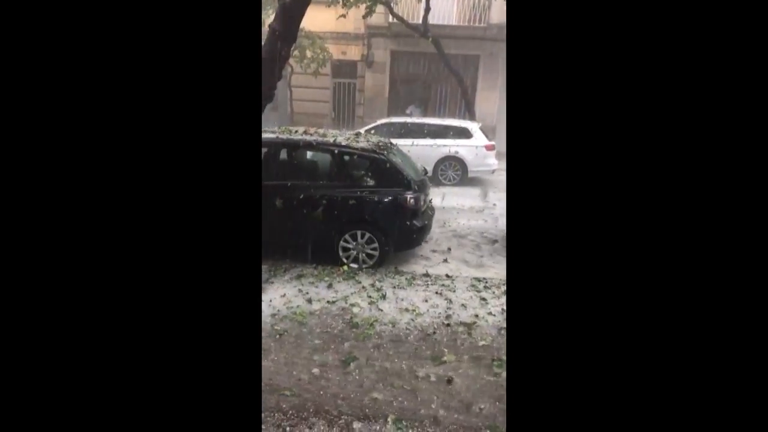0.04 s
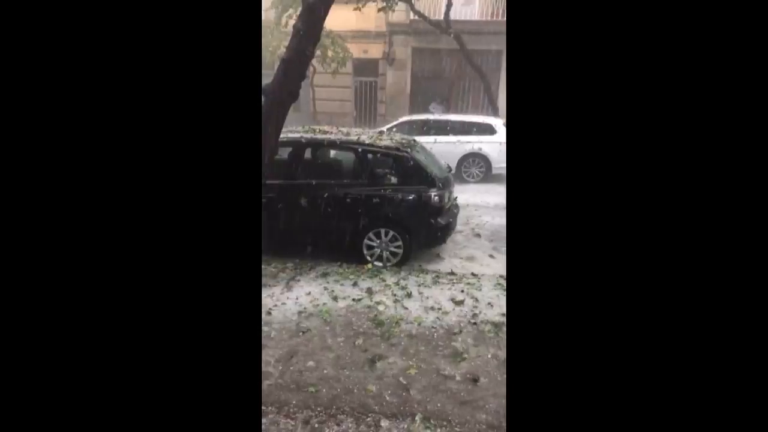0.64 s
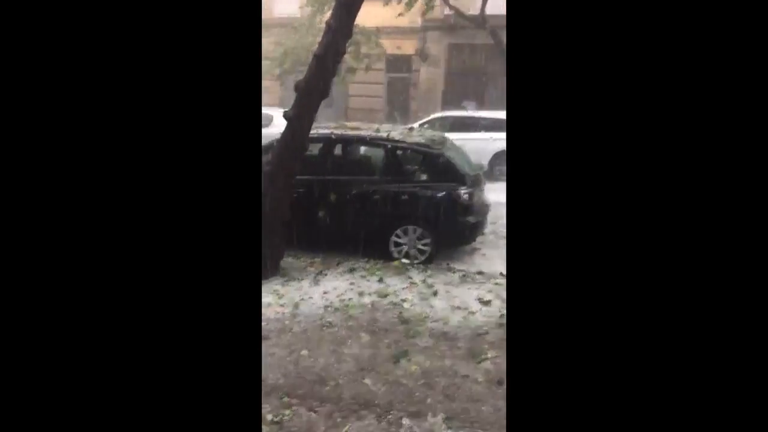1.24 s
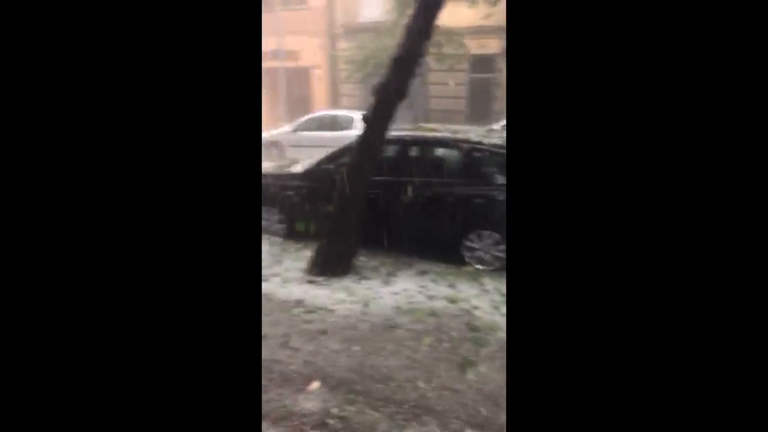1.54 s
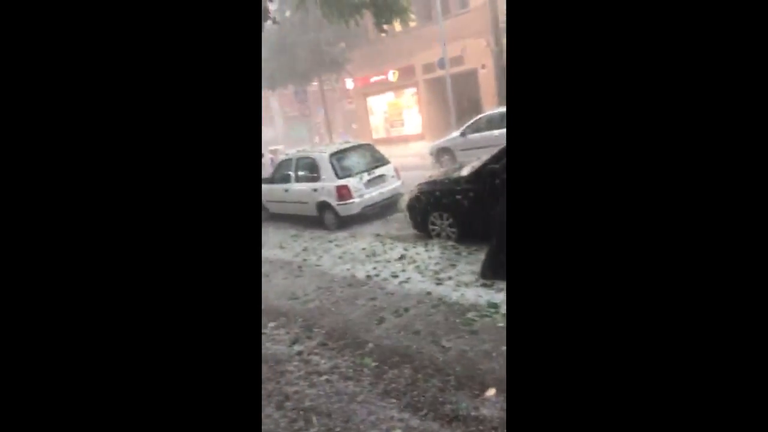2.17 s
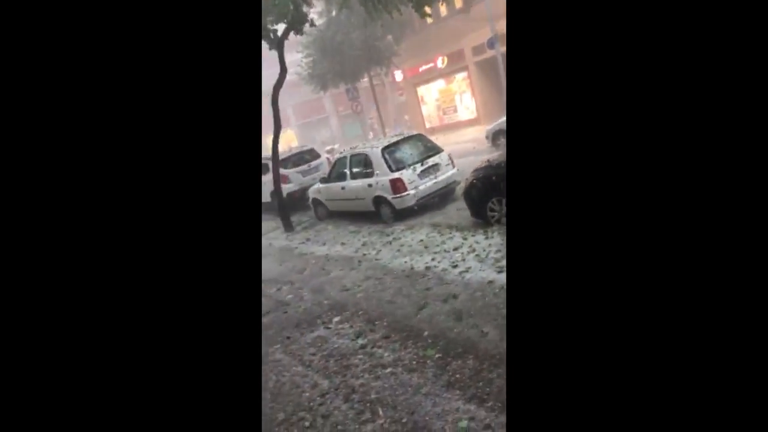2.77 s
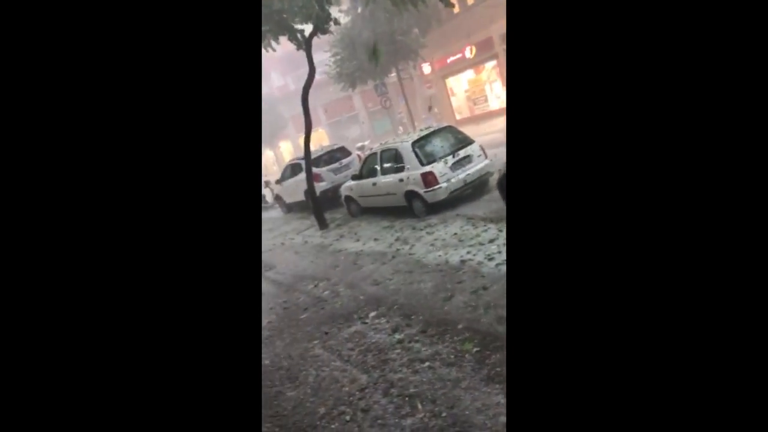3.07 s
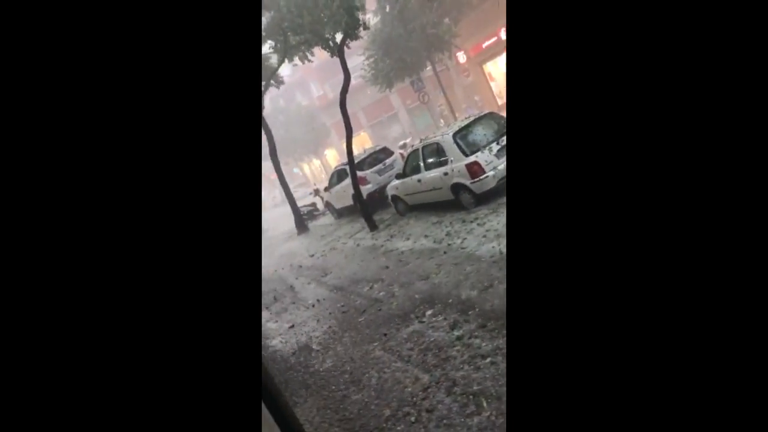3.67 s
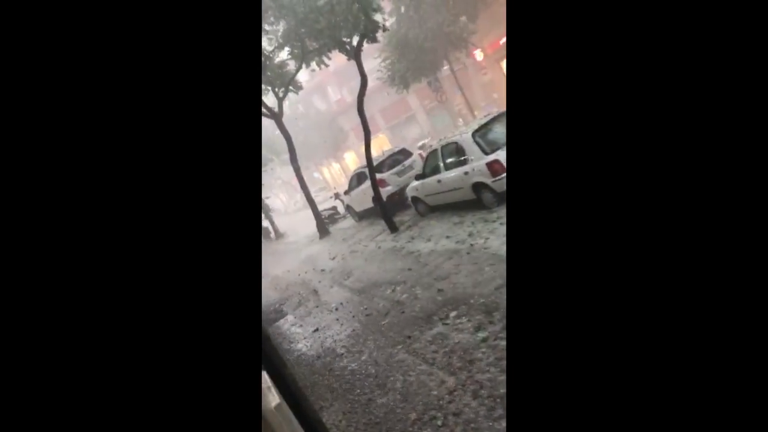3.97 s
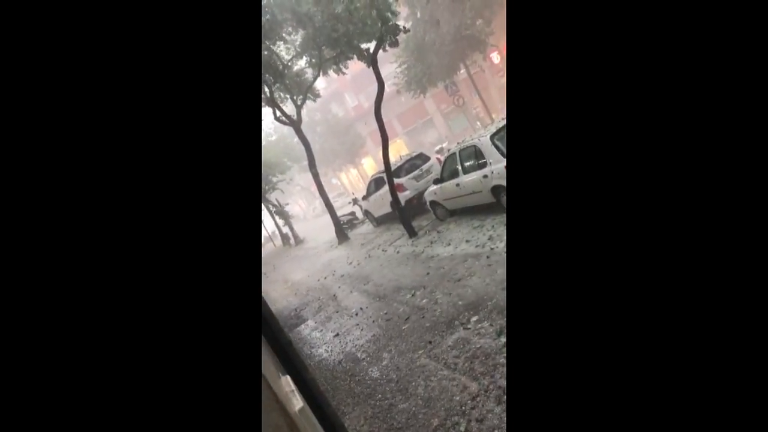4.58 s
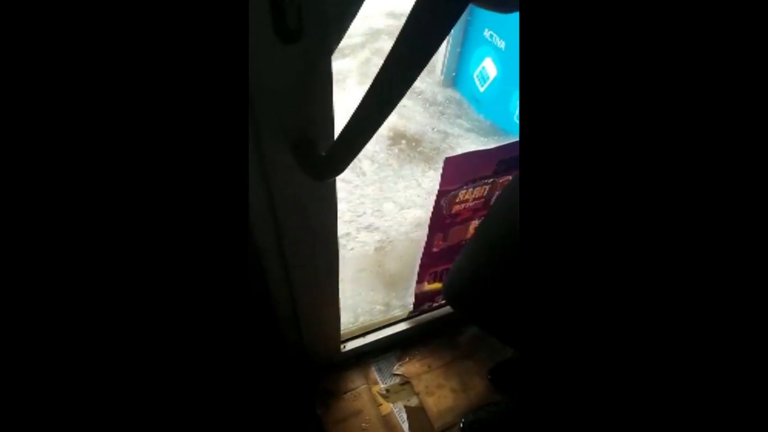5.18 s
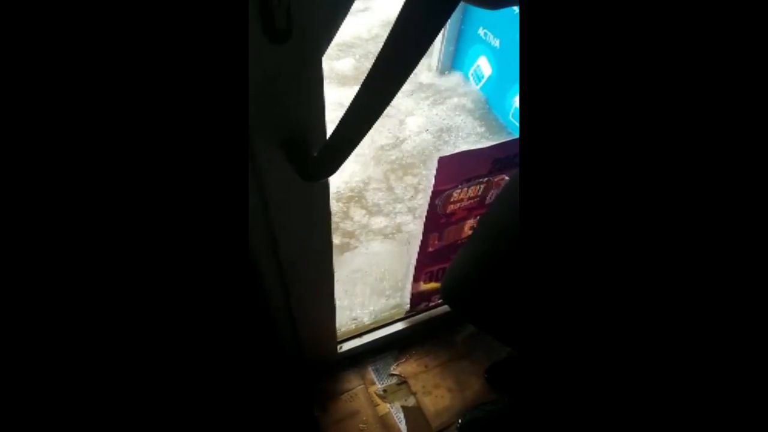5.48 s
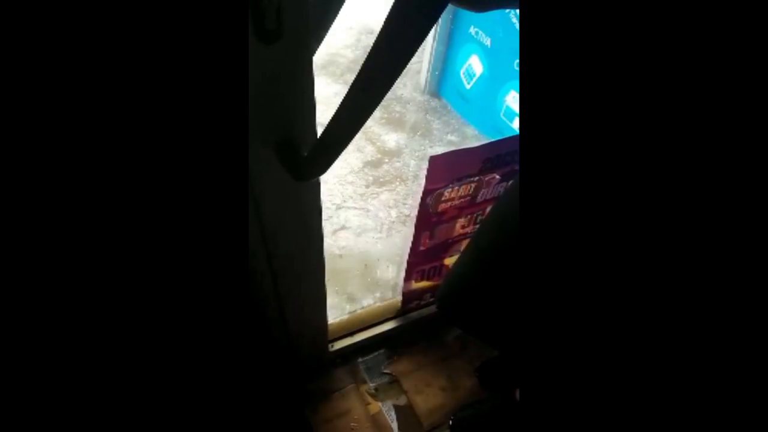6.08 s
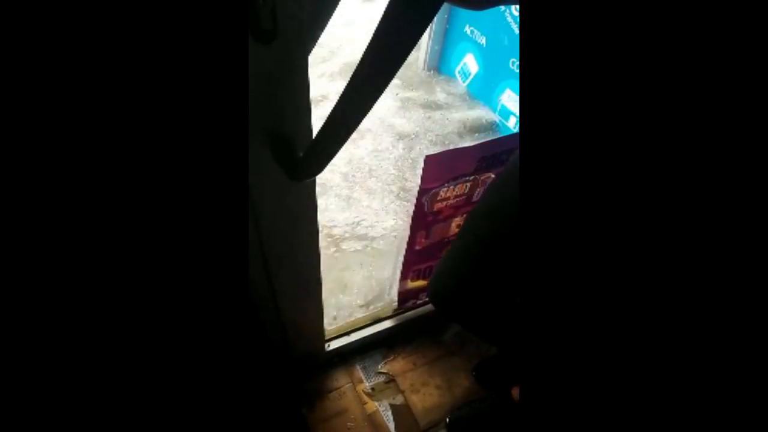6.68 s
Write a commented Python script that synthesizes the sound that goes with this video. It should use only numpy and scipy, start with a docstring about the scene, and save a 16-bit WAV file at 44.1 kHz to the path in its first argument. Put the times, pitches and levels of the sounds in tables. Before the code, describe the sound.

Heavy hail and rain fill a street with a loud, dense hiss, heard from a doorway. Nearer stones crack on the pavement, thud on parked car roofs and occasionally clink on metal, while gusts rumble underneath. After about five seconds the storm cuts off. A much fainter scene follows from inside a vehicle: floodwater rushes, bubbles and slaps at the door over a low engine drone and a few soft booms.

```python
"""A dense hiss of hail fills a street of parked cars, heard from a doorway. Countless random impacts
merge into noise; nearer stones tick and crack on the pavement and excite the modes of car roofs,
while gusts rumble underneath. Near 4.9 s the storm cuts off and a second, faint scene follows:
floodwater rushes, bubbles and slaps outside the door of a vehicle, whose engine drones at its
firing rate and whose body booms softly now and then."""
import sys
import numpy as np
from scipy import signal
from scipy.fft import rfft, irfft, next_fast_len
from scipy.io import wavfile
from scipy.ndimage import uniform_filter1d, map_coordinates

SR = 44100
rng = np.random.default_rng(int(sys.argv[2]) if len(sys.argv) > 2 else 0)


def dump_mix(stems):
    """Bounce the given channels to the path in sys.argv[1] as a 16-bit WAV at rate SR."""
    frames = np.atleast_2d(stems).T  # one column per channel
    limited = np.clip(frames, -1, 1)  # hard clip at full scale
    pcm = np.round(limited * 32767).astype(np.int16)
    wavfile.write(sys.argv[1], SR, pcm)


N = 300762

# bending modes of a car roof: f/Hz, relative level/dB, t60/s
ROOF_MODES = [(150.9, -5.5, 0.098), (184.5, -5, 0.12), (244.2, -1, 0.082), (267, -1.5, 0.07),
              (327.7, 1, 0.08), (380.8, 0, 0.058), (449, -3, 0.052)]
# spectrum of foam and droplets: f/Hz, relative level/dB
FOAM_SPECTRUM = [(2000, -7.5), (4500, 0), (6500, -3), (7800, -1.5), (10000, -7), (12500, -1.5),
                 (14200, -11)]
# likeness of left and right in the flood: f/Hz, correlation
FLOOD_CORRELATION = [(60, 0.87), (200, 0.93), (330, 0.33), (680, -0.22), (1050, 0.32), (2500, 0)]


def hail():
    """Superposition: far stones merge into noise, near ones ring; ice chips and rain add spray."""
    # spectra of the stones and of the spray: f/Hz, relative level/dB
    clatter_spectrum = [(300, -27), (430, -6), (520, -3.5), (660, 1.5), (1300, 0), (2000, -1.5),
                        (3100, 0.3), (4300, -0.5), (4900, -5.5), (6500, -35)]
    spray_spectrum = [(3500, -18.5), (4900, 0), (5600, 2), (7000, 0), (7700, -2.5), (8700, -0.5),
                      (9800, -1), (10400, -7.5), (10800, -31)]
    # the hail surges and thins about its slow decline: t/s, level/dB
    surge = [(0, -0.5), (.5, -0.5), (.62, 0.4), (.78, -.5), (1.05, 0), (1.2, -0.45), (1.42, -0.2),
             (1.75, -0.3), (2.45, -0.6), (2.7, -0.5), (3.05, -1), (3.3, -1), (3.5, -1.06), (3.95, -0.8),
             (4.25, -1.3), (4.4, -0.7), (4.68, -1.15), (4.88, -1.1)]
    ticks = amp(-10.5) * pings(count=7000, centre_hz=2600, octaves=.8, cycles=26, spread_db=1.85)
    chimes = amp(-15) * pings(count=700, centre_hz=2900, octaves=.45, cycles=170, spread_db=1.5,
                              size=2400)
    chips = amp(-10) * pings(count=6000, centre_hz=7400, octaves=.3, cycles=40, spread_db=2.2, size=200)
    clatter = shaped(rush(patchy_db=.9)[0] + ticks + chimes, clatter_spectrum)
    spray = shaped(rush(patchy_db=1.0)[0] + chips, spray_spectrum)
    fall = easing(-16.5, db_per_s=.07) * clatter + easing(-19.5, db_per_s=.09) * spray
    surge_db, = curves(surge)
    return amp(surge_db) * fall


def big_stones():
    """Brittle fracture: each stone shatters in a noise burst through a broad resonance."""
    # close impacts: t/s, relative level/dB, centre f/Hz, t60/s
    stones = [(.03, -15, 1200, 0.067), (.124, -15, 3200, 0.017), (.53, -16.5, 1097, 0.069),
              (1.031, -12.5, 3010, .035), (1.114, -13, 2600, .06), (1.255, -17, 1008, 0.045),
              (1.425, -11, 2982, 0.041), (1.55, -13.5, 2530, 0.017), (2.344, -13.5, 1600, 0.041),
              (2.5994, -10.5, 3300, 0.059), (2.63, -14.5, 1400, 0.048), (2.954, -15.5, 1500, .03),
              (3.02, -13, 3384, 0.023), (3.527, -11.5, 1050, .045), (3.59, -11, 1400, 0.046),
              (3.706, -13, 3830, .04), (3.865, -17.5, 1111, 0.053), (4.506, -14, 3405, .02),
              (4.765, -14.5, 2967, .04)]
    out, t = np.zeros(N + SR), np.arange(SR // 8) / SR
    for s, db, hz, t60 in stones:
        resonance = signal.butter(2, [hz / 1.4, hz * 1.4], "band", fs=SR)
        burst = unit(signal.lfilter(*resonance, rng.standard_normal(len(t))))
        out[round(s * SR):][:len(t)] += amp(db - 2.5 - 60 * t / t60) * burst
    return street_reverb(out[:N], wet_db=-3.5)


def car_roofs(detune=.051):
    """Convolution: random blows drive the damped modes of many panels, tuned close together."""
    t = np.arange(SR // 5) / SR
    drum = np.zeros(N)
    for hz, db, t60 in ROOF_MODES:
        for tuning in (-1, 0, 1):
            ring = amp(db - 60 * t / t60) * np.cos(2 * np.pi * hz * (1 + detune * tuning) * t)
            drum += signal.oaconvolve(impacts(count=800, spread_db=3.0), ring)[:N]
    panel_band = signal.butter(2, [90, 600], "band", fs=SR)
    return easing(-28, db_per_s=.12) * unit(signal.lfilter(*panel_band, drum))


def roof_hits(detune=.076, attack_s=.0017):
    """Free vibration: a heavy stone sets one panel booming, each panel tuned a little differently."""
    # heavy blows: t/s, relative level/dB
    hits = [(0.169, -21.5), (0.231, -22.5), (0.524, -21), (1.15, -24.5), (1.489, -23), (2.243, -21),
            (2.281, -20.5), (2.484, -19), (2.525, -23.5), (2.595, -23), (2.885, -24), (3.085, -21),
            (3.528, -21), (3.805, -22), (4.532, -22)]
    out, t = np.zeros(N + SR), np.arange(SR // 5) / SR
    hz, mode_db, t60 = np.transpose(ROOF_MODES)[:, :, None]
    attack = 1 - np.exp(-t / attack_s)
    for s, db in hits:
        tuning, phase = rng.uniform(-1, 1, (2, len(ROOF_MODES), 1))
        modes = np.sin(2 * np.pi * hz * (1 + detune * tuning) * t + np.pi * phase)
        ring = np.sum(amp(mode_db - 60 * t / t60) * modes, axis=0)
        out[round(s * SR):][:len(t)] += amp(db - 15.5) * unit(ring * attack)
    return street_reverb(out[:N], wet_db=-4)


def clinks(t60=.22, width_hz=150):
    """Beating: a stone on hard metal excites seven close, high modes that interfere as they decay."""
    # strikes on metal: t/s, level/dB, centre f/Hz
    strikes = [(.118, -23, 3900), (1.078, -24, 3790), (2.536, -22.5, 4300), (2.572, -25.5, 4350),
               (2.599, -22.5, 4290)]
    out, t = np.zeros(N + SR), np.arange(SR // 4) / SR
    for s, db, hz in strikes:
        offset, phase = rng.uniform(-1, 1, (2, 7, 1))
        modes = np.sin(2 * np.pi * (hz + width_hz * offset / 2) * t + np.pi * phase)
        out[round(s * SR):][:len(t)] += amp(db - 60 * t / t60) * unit(modes.sum(axis=0))
    return out[:N]


def wind(lull_db=-37, lumps_db=.8):
    """Turbulence makes a low, lumpy rumble; the gusts add to the lull in power."""
    # spectrum of the rumble: f/Hz, relative level/dB
    spectrum = [(20, -36), (33, -19), (48, -4), (75, 2.5), (115, 2), (170, -6.5), (260, -34.5)]
    # gusts: peak t/s, level/dB, half length/s
    gusts = [(0.548, -35.5, 0.46), (0.849, -29, 0.043), (1.109, -30.5, 0.075), (1.974, -29, 0.075),
             (2.752, -36.5, 0.4), (3.86, -32.5, 0.23), (4.41, -31.5, 0.083), (4.72, -32.5, 0.086)]
    t = np.arange(N) / SR
    gust_power = sum(amp(db) ** 2 * np.exp(-((t - s) / half_s) ** 2) for s, db, half_s in gusts)
    gain = np.sqrt(amp(lull_db) ** 2 + gust_power) * amp(lumps_db * wobble(16))
    return gain * shaped(rng.standard_normal(N), spectrum)


def floodwater(churn_db_per_db=2.2):
    """Bubble resonance: muddy water gurgles and fizzes, churning brighter as it runs faster."""
    # spectrum of the rush: f/Hz, relative level/dB
    spectrum = [(300, -25), (550, -8.5), (720, -8.5), (820, -2.5), (1180, -2), (1270, -10.5), (1600, -13.5),
                (1850, -16), (2500, -16), (3300, -16), (3850, -20.5), (6000, -34)]
    # strength of the current and of the foam's fizz: t/s, level/dB
    flow = [(4.93, -56.5), (5.15, -58.5), (5.38, -59.5), (5.8, -59.5), (6.0, -57.5), (6.2, -58),
            (6.33, -60), (6.8, -61)]
    fizz = [(4.91, -66), (5.12, -72.5), (5.28, -69), (5.55, -75.5), (5.75, -72), (6.08, -71.5),
            (6.3, -73.5), (6.45, -74.5), (6.6, -75.5), (6.82, -74.5)]
    flow_db, fizz_db = curves(flow) + curves(fizz)
    bubbles = np.array([pings(count=1500, centre_hz=1045, octaves=.39, cycles=22, spread_db=0)
                        for side in "LR"])
    drops = np.array([unit(impacts(count=3000, spread_db=4.5)) for side in "LR"])
    diffuse = stereo_shaped(rush(patchy_db=.5) + amp(-15) * bubbles, spectrum)
    direct = amp(-4.5) * from_left(shaped(rng.standard_normal(N), spectrum))
    churn = from_left(pings(count=3000, centre_hz=1550, octaves=.15, cycles=26, spread_db=1.3, size=500))
    churn *= amp(-10.5 + churn_db_per_db * (flow_db - flow_db.max()))
    froth = foam(rush(patchy_db=3.2) + amp(-4.5) * drops)
    water = amp(flow_db + .3 * wobble(13)) * doorway(diffuse + direct + churn)
    return water + amp(fizz_db + .6 * wobble(15)) * froth


def slaps():
    """Incoherent addition: small waves break on the door sill, and their hisses add in power."""
    # breaking waves: crest t/s, level/dB, rise time/s, t60/s
    waves = [(5.009, -60, .004, .07), (5.065, -65.5, .015, .25), (5.108, -68, .006, .12),
             (5.17, -68.5, 0.0091, .2), (5.415, -73, 0.046, 0.33), (5.635, -71.5, .004, 0.12),
             (5.935, -60.5, 0.12, 0.29), (6.155, -71, 0.007, .1), (6.665, -69, .025, .45),
             (6.76, -74, .03, .3)]
    drops = np.array([unit(impacts(count=4000, spread_db=3)) for side in "LR"])
    hiss = foam(rush(patchy_db=-1.5) + amp(-3) * drops)
    power = sum((amp(db) * swell(s, rise_s, t60)) ** 2 for s, db, rise_s, t60 in waves)
    return hiss * np.sqrt(power)


def engine(firing_hz=38):
    """Harmonics of rotation: an unsteady drone at the firing rate and the next two shaft orders."""
    # the drone swells and sinks: t/s, then relative level/dB of orders 2, 3 and 4
    drone = [(4.9, -60, -70, -56), (4.98, -59, -68, -52), (5.05, -68, -75, -68), (5.24, -62, -73, -68),
             (5.32, -66, -70, -66), (5.48, -57, -73, -66), (5.61, -57, -73, -74), (5.71, -74, -72, -59.5),
             (5.86, -71, -76, -63), (6.0, -72, -74, -59), (6.2, -66, -66, -60), (6.53, -72.5, -65, -68),
             (6.6, -74, -75, -74), (6.68, -60, -75, -62), (6.75, -74, -78, -74), (6.82, -61, -76, -72)]
    shaft = np.pi * np.cumsum(firing_hz * (1 + .035 * wobble(7))) / SR  # two firings a turn
    return sum(np.sqrt(2) * amp(db - 1.5 + 1.2 * wobble(9)) * np.sin(order * shaft)
               for order, db in zip((2, 3, 4), curves(drone)))


def bumps(half_s=.045, waver=.052):
    """Structural resonance: the vehicle's body booms in soft, wavering tones that swell and fade."""
    # dull knocks: peak t/s, level/dB, f/Hz
    knocks = [(5.23, -66, 178), (6.22, -66, 203.3), (6.68, -63, 169)]
    out, t = np.zeros(N), np.arange(N) / SR
    for s, db, hz in knocks:
        phase = 2 * np.pi * np.cumsum(hz * (1 + waver * wobble(40))) / SR
        out += amp(db) * np.exp(-((t - s) / half_s) ** 2) * np.sin(phase)
    return out


def cabin():
    """Low-pass noise: the steady rumble inside the vehicle."""
    # spectrum of the rumble: f/Hz, relative level/dB
    spectrum = [(20, 1), (55, 0), (95, -2.5), (140, -1), (215, -2.5), (260, -9.5), (380, -8), (600, -27.5)]
    return amp(-65.5) * stereo_shaped(rush(patchy_db=-2.5), spectrum)


def street_reverb(x, wet_db):
    """Reverberation: reflections from the house fronts form a tail whose treble dies first."""
    # reverberation time: f/Hz, t60/s
    decay = [(200, 0.5), (2000, 0.41), (10000, 0.019)]
    hz, t, noise = signal.stft(rng.standard_normal(SR // 2), SR, nperseg=256)
    tail = signal.istft(noise * amp(-60 * t / along(decay, hz)[:, None]), SR, nperseg=256)[1]
    return x + amp(wet_db) * signal.fftconvolve(x, tail / np.linalg.norm(tail))[:N]


def doorway(x):
    """Cavity resonance: the hollow doorway lifts narrow bands of x; the result has rms 1."""
    # resonances: f/Hz, width/Hz, lift/dB
    peaks = [(820, 29, 5.5), (870, 24, 6.5), (929, 26, 3.5), (982, 44, 5.5), (1098, 31, 6), (1177, 44, 4.5),
             (1358, 44, 6.5), (1545, 44, 5), (1726, 26, 7)]
    lift_db = lambda f: sum(db / (1 + (2 * (f - hz) / width) ** 4) for hz, width, db in peaks)
    return unit(filtered(x, lambda f: amp(lift_db(f))))


def from_left(x, delay_s=.0006):
    """Interaural delay: sound from the left reaches the right ear later."""
    return filtered(x, lambda hz: np.exp(-2j * np.pi * hz * [[0], [delay_s]]))


def foam(pair):
    """Interaural level difference: two noises take the colour of foam, 2 dB louder on the left."""
    return stereo_shaped(pair, FOAM_SPECTRUM) * amp([[1], [-1]])


def pings(count, centre_hz, octaves, cycles, spread_db, size=400):
    """Damped oscillators struck at random, each at its own pitch for size samples at most; rms 1."""
    when, strength, life = rng.random((count, 3)).T[:, :, None]
    hz = np.clip(centre_hz * 2 ** (octaves * rng.standard_normal((count, 1))), 100, SR / 2)
    k = np.arange(size)
    turns = hz / SR * k
    start = np.sqrt(hz) * amp(-spread_db * np.log(np.maximum(strength, .02)))  # high rings start louder
    rings = start * amp(-60 / (cycles * (.5 + life)) * turns) * np.sin(2 * np.pi * turns)
    samples = (when * N).astype(int) + k
    return unit(np.bincount(samples.ravel(), rings.ravel(), N)[:N])


def impacts(count, spread_db):
    """Shot noise: impulses at random moments, most small and a few large."""
    when, size, sign = rng.random((count, 3)).T
    blows = amp(-spread_db * np.log(np.maximum(size, .01))) * np.sign(sign - .5)
    return np.bincount((when * N).astype(int), blows, N)


def rush(patchy_db):
    """Random modulation: two noises share louder and softer patches in time and frequency."""
    noise = signal.stft(rng.standard_normal((2, N)), nperseg=512)[2]
    patches = uniform_filter1d(rng.standard_normal(noise.shape[1:]), size=9, axis=0)
    patches = uniform_filter1d(patches, size=10, axis=1)
    return unit(signal.istft(noise * amp(patchy_db * unit(patches)), nperseg=512)[1][:, :N])


def stereo_shaped(pair, spectrum):
    """Mid-side mixing: two unrelated signals take this spectrum and the flood's correlation; rms 1."""
    angle = lambda hz: np.arccos(np.clip(along(FLOOD_CORRELATION, hz), -1, 1)) / 2
    response = lambda hz: amp(along(spectrum, hz)) * [np.cos(angle(hz)), np.sin(angle(hz))]
    mid, side = filtered(pair, response)
    return unit(np.array([mid + side, mid - side]))


def shaped(x, spectrum):
    """Spectral weighting of x, at rms 1."""
    return unit(filtered(x, lambda hz: amp(along(spectrum, hz))))


def filtered(x, response):
    """Linear filtering: the spectrum of x times a frequency response."""
    size = next_fast_len(N + SR // 2)
    return irfft(rfft(x, size) * response(np.fft.rfftfreq(size, 1 / SR)), size)[..., :N]


def swell(s, rise_s, t60):
    """Exponential growth to 1 at time s, then exponential decay."""
    t = np.arange(N) / SR - s
    return np.exp(np.minimum(t, 0) / rise_s) * amp(-60 * np.maximum(t, 0) / t60)


def easing(db, db_per_s):
    """Exponential decline of gain as the storm slowly lets up."""
    return amp(db - db_per_s * np.arange(N) / SR)


def wobble(rate):
    """A smooth random curve, rate knots a second."""
    knots = rng.standard_normal(1024)
    n = np.arange(N)
    coarse = n[::32]
    return np.interp(n, coarse, map_coordinates(knots, [coarse * rate / SR], mode="mirror"))


def curves(rows):
    """Linear interpolation of each column after the time, one value per sample."""
    s, *columns = np.transpose(rows)
    return [np.interp(np.arange(N) / SR, s, column) for column in columns]


def along(points, hz):
    """Interpolation of (f/Hz, value) points on a log frequency axis."""
    f, values = np.transpose(points)
    return np.interp(np.log(hz + 1), np.log(f + 1), values)


def amp(db):
    """Decibels to gain."""
    return np.exp(np.asarray(db) * (np.log(10) / 20))


def unit(x):
    """Normalisation to rms 1."""
    return x / np.sqrt(np.mean(x ** 2) + 1e-20)


def scene(cut_s=4.8885, fade_s=.001, storm_top_hz=10850):
    """An abrupt crossfade from the storm, alike in both ears, to the wider flood."""
    storm = hail() + car_roofs() + roof_hits() + big_stones() + clinks() + wind()
    storm = filtered(storm, lambda hz: hz < storm_top_hz)
    flood = floodwater() + cabin() + slaps() + bumps() + engine()
    after = np.clip((np.arange(N) / SR - cut_s) / fade_s + .5, 0, 1)
    return (1 - after) * storm + after * flood


def record(dry):
    """Band limiting: an ideal low-pass at 14.3 kHz."""
    return filtered(dry, lambda hz: hz < 14300)


dry = scene()
out = record(dry)
dump_mix(out)
```